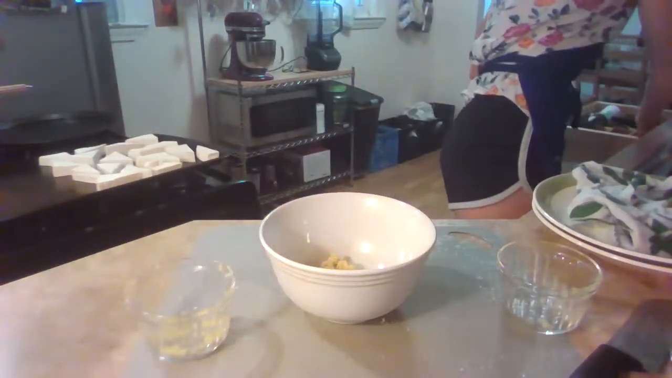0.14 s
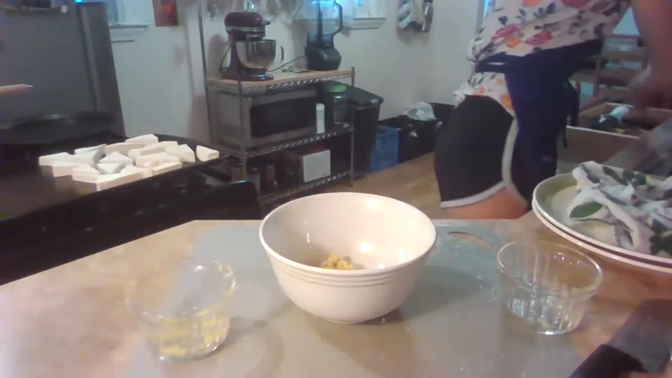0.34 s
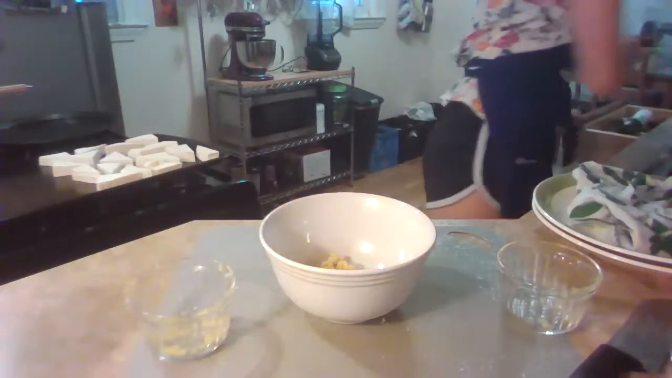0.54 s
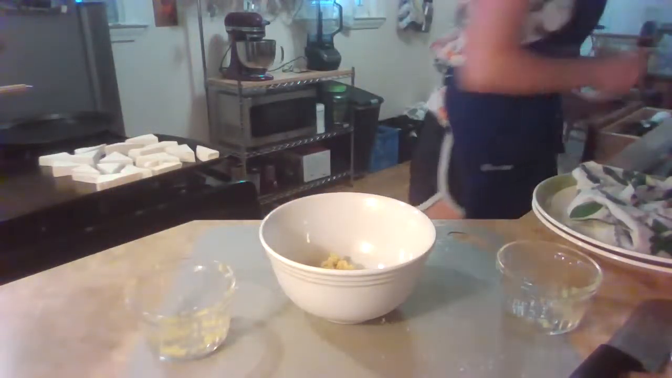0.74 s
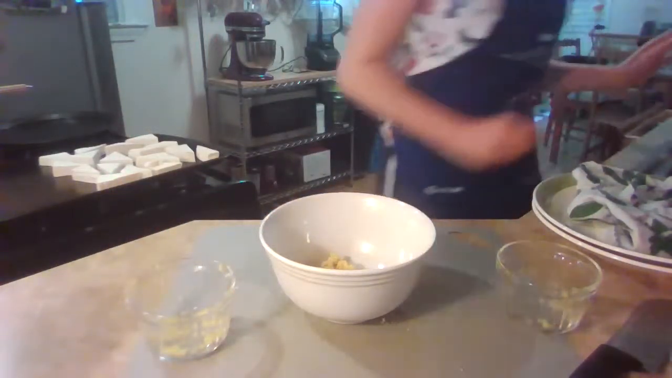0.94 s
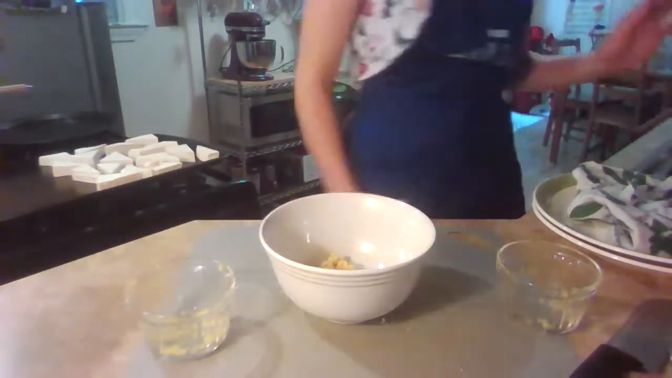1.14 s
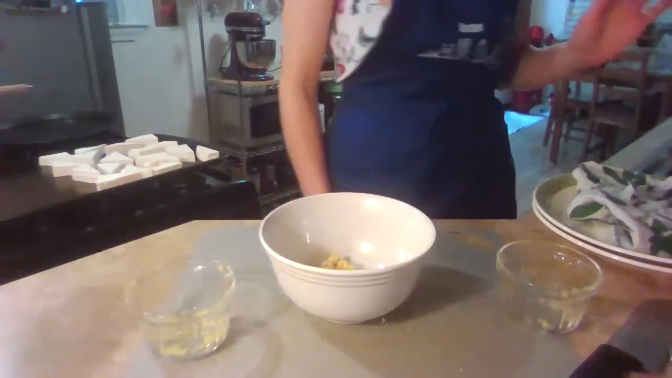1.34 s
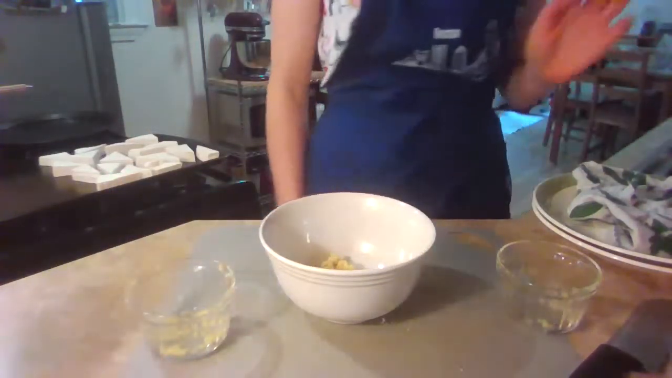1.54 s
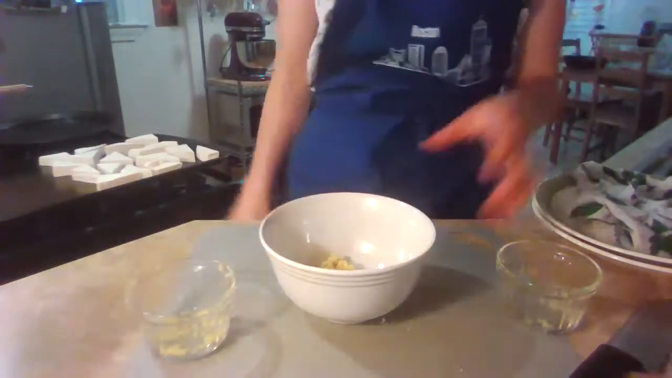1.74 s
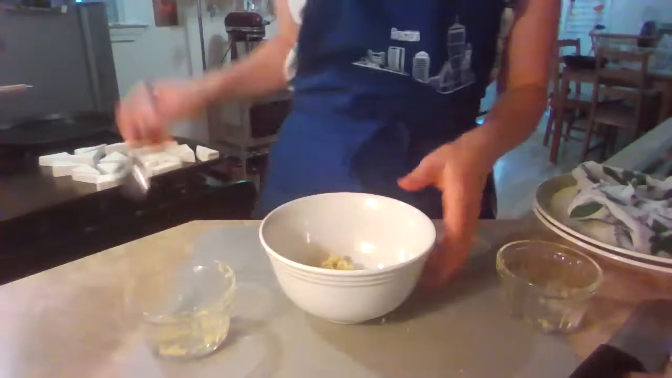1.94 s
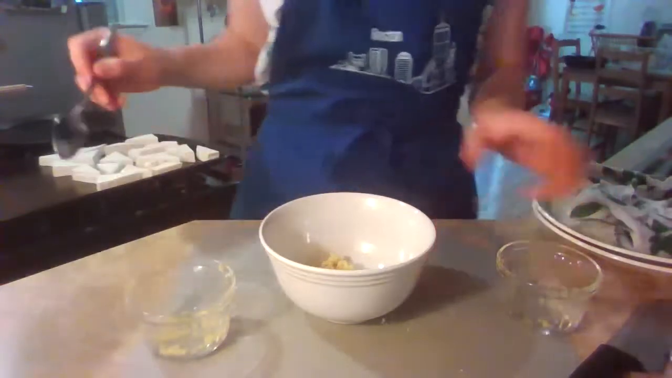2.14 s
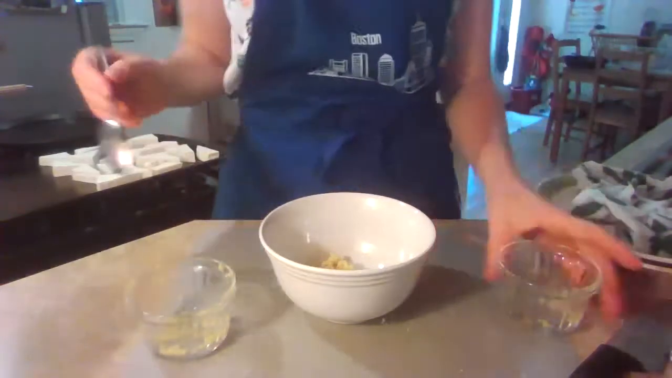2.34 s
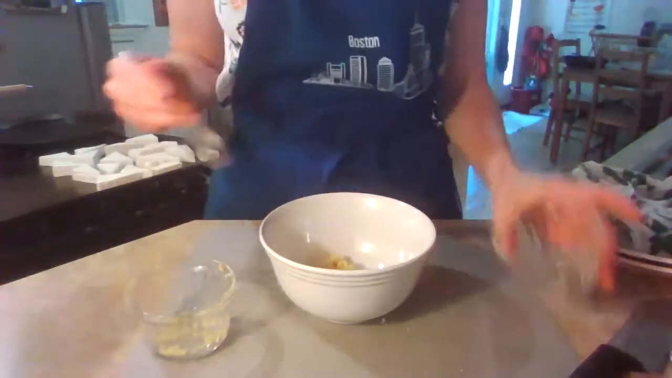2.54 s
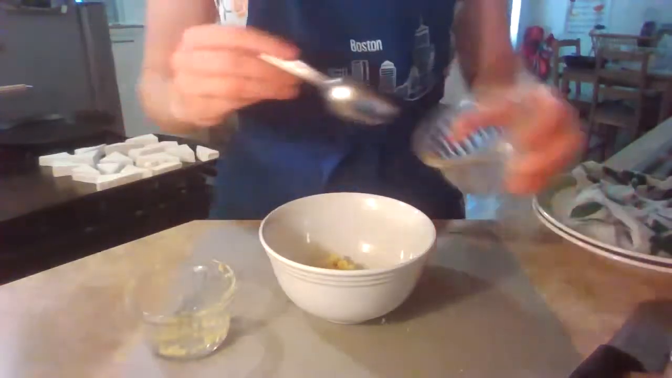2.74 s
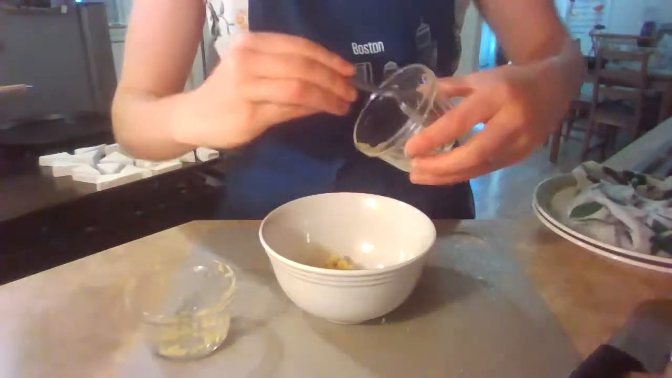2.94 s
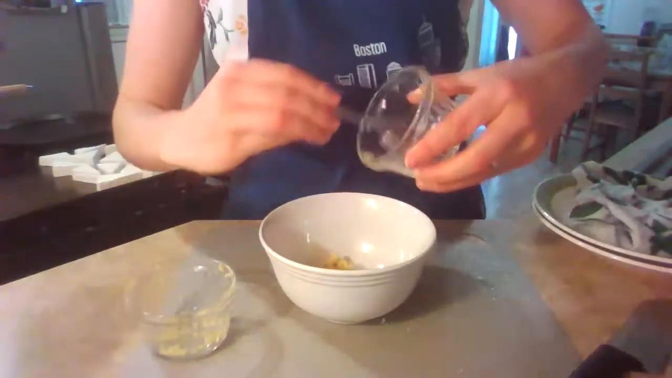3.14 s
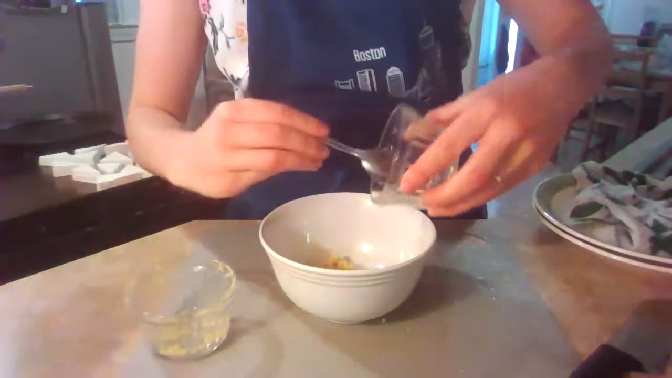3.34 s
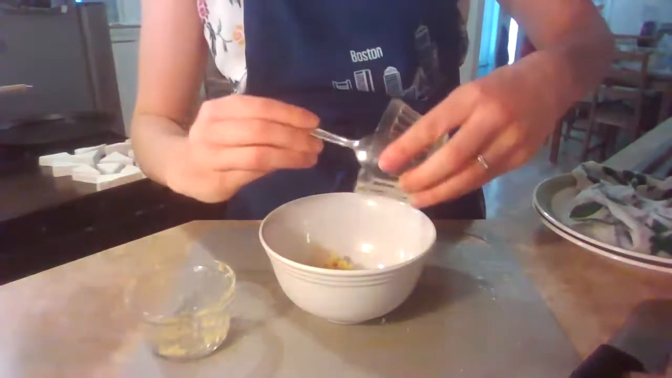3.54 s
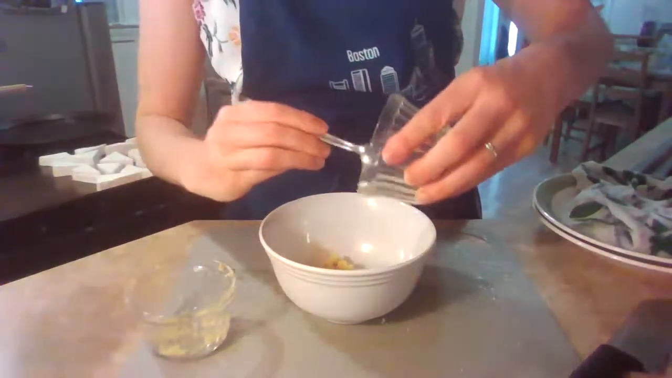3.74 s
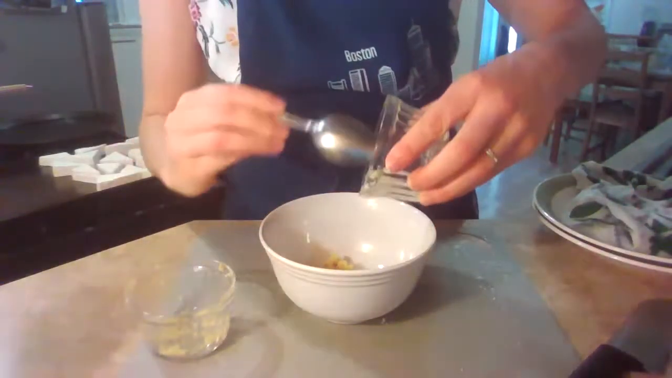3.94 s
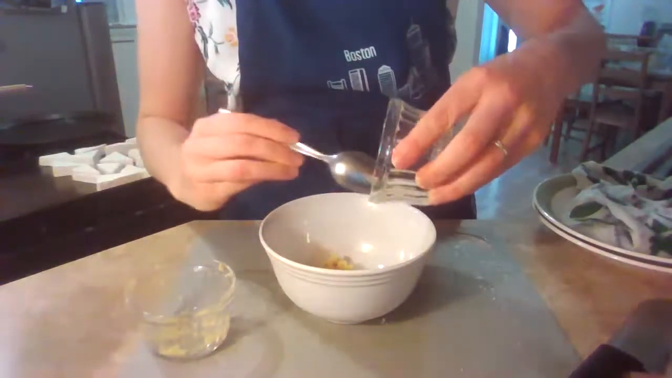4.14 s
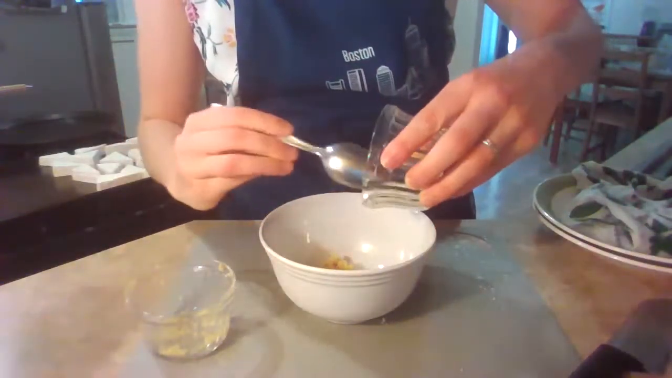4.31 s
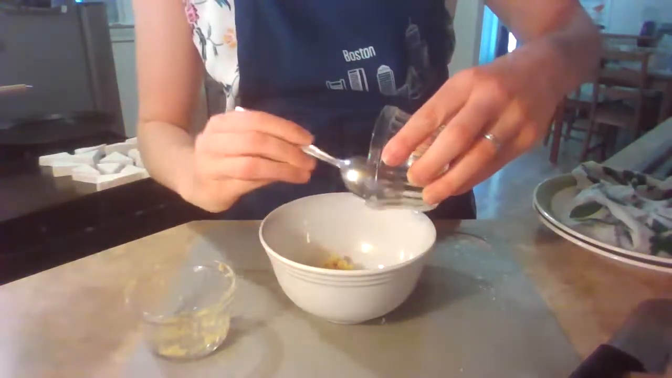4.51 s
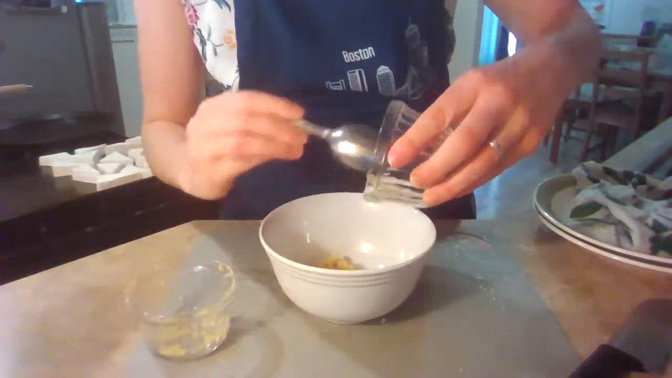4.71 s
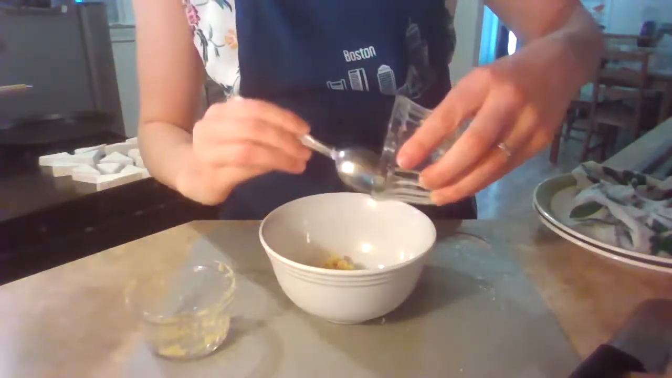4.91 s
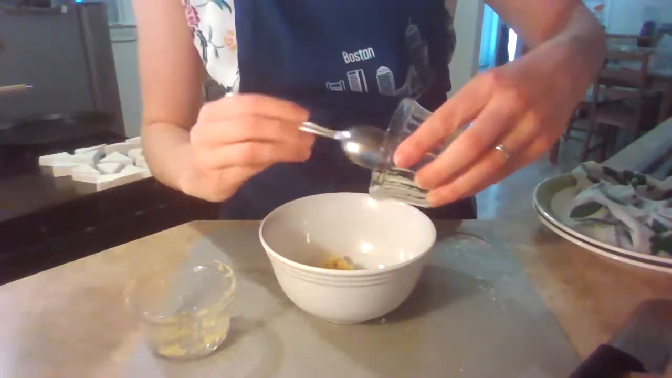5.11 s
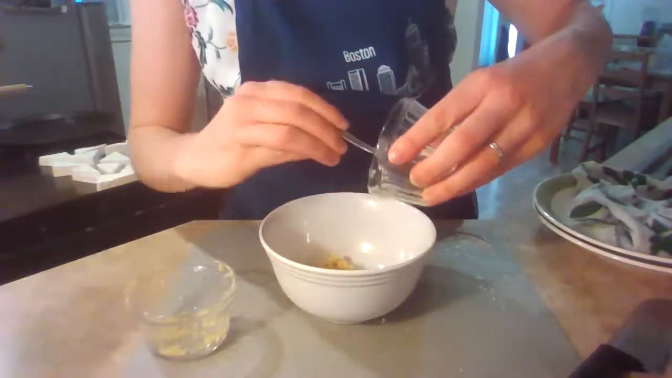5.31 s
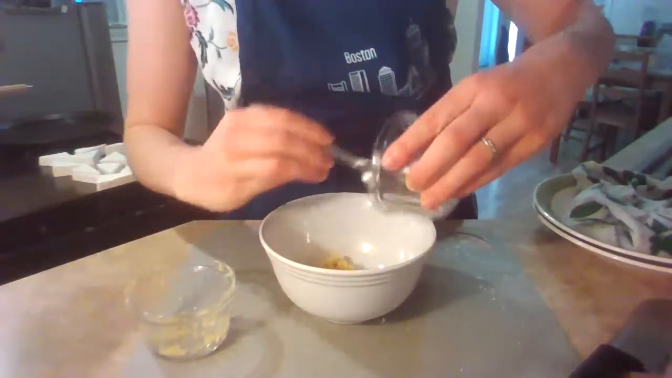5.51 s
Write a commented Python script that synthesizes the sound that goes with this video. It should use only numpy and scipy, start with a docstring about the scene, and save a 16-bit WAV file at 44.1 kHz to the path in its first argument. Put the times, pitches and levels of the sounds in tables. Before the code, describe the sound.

After a short jangle of cutlery and hollow drawer knocks, a steel spoon clinks and scrapes against a little glass dish in a kitchen.

```python
"""A steel spoon taps and scrapes inside a small glass dish. Each impact excites the normal modes of
glass and spoon, which the fingers damp quickly; stick-slip friction drives the scraping. Before this,
cutlery rattles in a drawer, the drawer is pushed shut with hollow knocks, and a hand takes the dish
off the counter. The kitchen adds a short reverberation, over a low appliance hum and microphone hiss."""
import sys
import numpy as np
from scipy import signal
from scipy.fft import rfft, irfft
from scipy.io import wavfile

SR = 44100
rng = np.random.default_rng(int(sys.argv[2]) if len(sys.argv) > 2 else 0)


def wrap_up_sound(samples):
    """Save the sound to the file named by the first command line argument, as 16-bit audio."""
    columns = np.atleast_2d(samples).T
    # keep every value between -1 and 1, then stretch to whole-number steps
    tamed = np.clip(columns, -1, 1)
    steps = np.round(tamed * 32767).astype(np.int16)
    wavfile.write(sys.argv[1], SR, steps)


N = 249821


def from_db(db):
    """Amplitude ratio of a level; the levels in the tables are relative."""
    return 10 ** (np.asarray(db) / 20)


def unit_rms(x):
    """Normalisation to an rms of 1."""
    return x / np.sqrt(np.mean(x ** 2) + 1e-20)


def at_hz(points, hz):
    """Interpolation on a logarithmic frequency axis."""
    frequencies, values = np.transpose(points)
    return np.interp(np.log(hz + 1), np.log(frequencies), values)


def filtered(x, kind, hz, order=4):
    """Maximally flat low-, high- or band-pass filtering."""
    return signal.sosfilt(signal.butter(order, hz, kind, fs=SR, output="sos"), x)


def coloured(x, spectrum):
    """Minimum-phase filtering that preserves the power of white noise."""
    size = 2 ** 13
    log_gain = at_hz(spectrum, np.fft.rfftfreq(size, 1 / SR)) * np.log(10) / 20
    cepstrum = irfft(log_gain)
    cepstrum[1:size // 2] *= 2
    response = irfft(np.exp(rfft(cepstrum[:size // 2], size)))
    return signal.fftconvolve(x, response / np.linalg.norm(response))[:N]


def resonator(force, hz, t60):
    """Damped harmonic oscillator: each impulse starts a decaying sine."""
    r, w = from_db(-60 / (t60 * SR)), 2 * np.pi * hz / SR
    return signal.lfilter([0, np.sin(w)], [1, -2 * r * np.cos(w), r * r], force + 1e-18)


def driven(force, modes):
    """Modal superposition: the summed response to one force, at rms 1."""
    return unit_rms(sum(from_db(db) * resonator(force, hz, t60) for hz, db, t60 in modes))


def impulses(per_s, spread_db):
    """Shot noise: independent clicks of uneven size, at rms 1."""
    sizes = from_db(spread_db * np.minimum(rng.exponential(1, N), 4)) * rng.choice([-1, 1], N)
    return unit_rms(sizes * (rng.random(N) < per_s / SR))


def flicker(corner_hz):
    """Random modulation: low-passed noise at rms 1."""
    r = np.exp(-2 * np.pi * corner_hz / SR)
    return unit_rms(signal.lfilter([1], [1, -2 * r, r * r], rng.standard_normal(N + SR))[SR:])


def bursts(rows):
    """Superposed envelopes with exponential decay, from rows of t/s, level/dB, rise/ms, fall/ms."""
    out, ms = np.zeros(N + SR), np.arange(SR // 3) * 1000 / SR
    for s, db, rise_ms, fall_ms in rows:
        at = round(s * SR)
        out[at:at + len(ms)] += from_db(db) * (1 - np.exp(-ms / rise_ms)) ** 2 * np.exp(-ms / fall_ms)
    return out[:N]


def gain_curves(rows):
    """Gains interpolated in dB from rows of t/s and levels/dB; silent outside their span."""
    times, *levels = np.transpose(rows)
    return from_db([np.interp(np.arange(N) / SR, times, db, -150, -150) for db in levels])


# spectrum of rumble and hiss: f/Hz, spectral level/dB
NOISE_FLOOR = [(13, -62.5), (22, -50.5), (44, -12.5), (88, -23.5), (123, -5), (213, -20), (392, -17),
               (426, -20.5), (762, -28), (829, -33), (1160, -30.5), (5300, -49.5), (9220, -32.5),
               (15200, -36), (16500, -64)]
def background():
    """Broadband noise, and an appliance hum that wavers as narrow-band noise does."""
    hum = unit_rms(resonator(rng.standard_normal(N), hz=121.8, t60=0.126))
    floor = coloured(rng.standard_normal(N), NOISE_FLOOR) * from_db(flicker(3.5))
    return from_db(-53) * floor + from_db(-53.5) * hum


# reverberation time of the kitchen: f/Hz, T60/s
REVERB_TIMES = [(250, 0.17), (1500, 0.37), (5000, 0.43), (14000, 0.41)]
def reverberation(x):
    """Diffuse field: convolution with octave bands of noise, each decaying at its own rate."""
    t, tail = np.arange(SR // 2) / SR, 0
    for low_hz in 150 * 2. ** np.arange(7):
        band = filtered(rng.standard_normal(len(t)), "band", [low_hz, 2 * low_hz], order=2)
        tail += band * from_db(-60 * t / at_hz(REVERB_TIMES, 0.88 * low_hz))
    tail *= 1 - np.exp(-(t / 0.0009) ** 2)
    return signal.fftconvolve(x, tail / np.linalg.norm(tail))[:N]


# dull bumps through the counter: t/s, level/dB, f/Hz, T60/s
COUNTER_BUMPS = [(0.712, -43, 163, 0.27), (1.031, -48, 74.5, 0.13), (2.368, -28.5, 143.3, .14),
                 (2.376, -32.5, 85.5, 0.15), (2.421, -39, 199, 0.21), (3.49, -24, 84.2, 0.044)]
def counter():
    """Structure-borne sound: each bump is one low damped mode with a soft onset."""
    out, t = np.zeros(N), np.arange(SR // 3) / SR
    onset = 1 - np.exp(-t / 0.0085)
    for s, db, hz, t60 in COUNTER_BUMPS:
        at = round(s * SR)
        out[at:at + len(t)] += from_db(db + 7.5 - 60 * t / t60) * onset * np.sin(2 * np.pi * hz * t)
    return out


# knocks of the drawer: t/s, level/dB, rasp re knock/dB, fall/ms
DRAWER_KNOCKS = [(0.851, -44, -6.5, 135), (.92, -46.5, -18, 38), (0.991, -60.5, 17.5, 57),
                 (1.05, -61, -5, 36), (1.499, -57.5, -0.5, 120), (1.588, -52.5, -1.5, 71),
                 (1.658, -57, 5, 25)]
# modes of the drawer: f/Hz, level/dB, T60/s
DRAWER_MODES = [(298, -1, 0.079), (448, 2, 0.06), (645, 5, 0.027), (1205, -2.5, 0.062)]
# rasp of sliding wood: f/Hz, spectral level/dB
WOOD_SPECTRUM = [(300, -10), (650, 1), (1200, -7.5), (2050, -11), (2350, -9), (2750, -15.5), (7000, -24.5)]
def drawer():
    """Forced vibration of a wooden box: contact noise gives hollow knocks and a rasp."""
    force = impulses(per_s=3000, spread_db=0.53)
    knocks = bursts([(s, db, 8, fall_ms) for s, db, _, fall_ms in DRAWER_KNOCKS])
    slides = bursts([(s, db + rasp_db, 6, fall_ms) for s, db, rasp_db, fall_ms in DRAWER_KNOCKS])
    return knocks * driven(force, DRAWER_MODES) + slides * coloured(force, WOOD_SPECTRUM)


# shifts of the cutlery heap: t/s, level/dB, treble re lower band/dB
HEAP_SHIFTS = [(.0, -18, 5.5), (0.02, -23, 3.5), (.06, -23.5, -17), (0.12, -20, -5), (0.141, -11.5, 7),
               (.19, -17.5, 4), (0.272, -19.5, -0.5), (.315, -31, -19)]
# clatter of the heap: f/Hz, spectral level/dB
HEAP_SPECTRUM = [(130, -57), (250, -14), (500, -3), (900, -10), (1250, -2.5), (3100, -3.5), (7400, -12.5),
                 (10000, -3), (11100, -7.5), (12300, 0.5), (15600, -1)]
# single pieces ringing out: t/s, f/Hz, level/dB, T60/s
STEEL_RINGS = [(.012, 2240, -24, .08), (.015, 1195, -22, .3), (.022, 10370, -23, .4), (.12, 11765, -18, .3),
               (.125, 3903, -24, .4), (.135, 7410, -28, .45), (.14, 10400, -19, .45), (.145, 2990, -14, .2),
               (.15, 500, -25, .25), (.16, 9573, -22, .4), (.165, 9078, -26, .4), (.275, 2560, -24, .22),
               (.28, 2690, -23, .25), (.275, 1320, -23, .2), (.28, 3430, -26, .22), (.275, 5385, -26, .25),
               (.285, 11300, -28, .12)]
def cutlery():
    """Random collisions merge into noise as the heap shifts, and excite a few clear steel modes."""
    hail = coloured(impulses(per_s=5000, spread_db=3.3), HEAP_SPECTRUM)
    split_hz, rise_ms, fall_ms = 7000, 6.3, 38.3
    lower = bursts([(s, db, rise_ms, fall_ms) for s, db, _ in HEAP_SHIFTS])
    treble = bursts([(s, db + treble_db, rise_ms, fall_ms) for s, db, treble_db in HEAP_SHIFTS])
    out = lower * unit_rms(filtered(hail, "low", split_hz))
    out += treble * unit_rms(filtered(hail, "high", split_hz))
    t = np.arange(SR // 2) / SR
    for s, hz, db, t60 in STEEL_RINGS:
        at = round(s * SR)
        jostled = unit_rms(resonator(hail[:SR], hz, t60=.045)[-len(t):])   # neighbours keep knocking it
        out[at:at + len(t)] += from_db(db - 60 * t / t60) * (1 - np.exp(-t / 0.0025)) * jostled
    return out


# impacts on the glass, first as the dish is taken up, then by the spoon:
# t/s, crack level/dB, ring level/dB, brightness/dB, spoon bowl f/Hz, contact time/ms
IMPACTS = [(2.3415, -22.5, -58, 26, 5520, 5.3), (2.9273, 1, -12, -1.5, 4100, 5.9),
           (2.9417, -16.5, -12, -4, 5500, 20), (2.9843, 1, -8.5, -34, 4630, 3.4),
           (3.0745, -16, -26, -25, 4600, 3.2), (3.0868, -4, -15, -33, 4790, 3.6),
           (3.128, -14.5, -29, -1, 3100, 2.1), (3.1516, -12.5, -35, -15, 3040, 3.3),
           (3.1841, -10.5, -22, -10, 4805, 8.9), (3.241, -9, -21, 2.5, 3370, 3.4),
           (3.2597, -9.5, -16.5, 4, 3075, 8.7), (3.2949, -4, -18, -10, 3428, 7.6),
           (3.3457, -8.5, -17.5, -22, 3640, 5.8), (3.5767, 1, -8.5, 0, 4830, 7.1),
           (3.6664, -9.5, -13, 0.5, 4870, 4.5), (3.686, -2.5, -12, -17, 5320, 8.6),
           (3.7087, -23, -5.5, -12, 3020, 10.4), (3.7336, 3.5, -3.5, 4, 3370, 2.9),
           (3.7529, 6.5, -6.5, 4, 3650, 5.2), (4.0321, -14, -21.5, -8, 3780, 7.5),
           (4.0832, -9, -4, -11, 3000, 5.9), (4.1044, -9, -6.5, -11, 3170, 10.7),
           (4.1169, -15, -1.5, -17, 3230, 2.5), (4.1378, -23, -9.5, -35, 4580, 3.8),
           (4.155, -33, -3.5, -13, 3220, 3.8), (4.167, -10.5, -16.5, 10, 3320, 6.5),
           (4.1928, -18, -7.5, -6, 3190, 2.6), (4.415, -26.5, -30.5, -4, 3960, 3.4),
           (4.4904, -20.5, -26, 2.5, 4810, 7), (4.518, -20, -20.5, -14, 3600, 3.7),
           (4.545, -20, -25, -12, 3330, 3.6), (4.571, -15, -17, -1, 3460, 2.9),
           (4.6152, -41, -22, -7, 3190, 6.7), (4.8281, -27, -20.5, -39, 2890, 4.3),
           (4.911, -20.5, -18.5, -2.5, 3800, 6.9), (4.966, -22, -26, -9, 3480, 4.1),
           (4.9926, -1, -2, -0.5, 3270, 2.9), (5.0137, -10.5, -27, 7.5, 4440, 4.4),
           (5.231, -6, -21, 16.5, 4700, 7), (5.2578, -1.5, -12, 3, 4845, 10.2),
           (5.3508, -2.5, -10, 3.5, 3220, 4), (5.3708, -11, -8, 3, 2900, 16.8),
           (5.3813, -12.5, -7, -12, 3400, 2.4), (5.422, -13.5, -1.5, -16, 3480, 9.3),
           (5.465, -6, -11.5, -21, 3610, 1.9), (5.4842, -11, -14.5, 4.5, 3440, 5.1),
           (5.5822, -3, -21.5, 26.5, 3380, 7.5), (5.6061, 2, -16, 28.5, 3380, 6.8),
           (5.6163, -20, -16, 26, 3180, 3)]
# freedom of the spoon to ring; pressing chokes the handle and frees the bowl:
# t/s, handle re impact/dB, bowl re impact/dB
SPOON_GRIP = [(2.34, -50, -12), (2.93, -20.5, -48), (3.08, -2.5, -17), (3.26, -7, 5.5), (3.35, -10, -6.5),
              (3.58, -24, -39), (3.7, -12, -4), (3.75, -26, -11), (4.03, -24.5, -13), (4.109, -13, -23),
              (4.16, -40, -8.5), (4.49, -14, -12.5), (4.6, -46, -2.5), (4.829, -23.5, -29.5),
              (5.0, -32.5, -5.5), (5.26, -11, -2.5), (5.422, -16.5, -10), (5.475, -40, -3),
              (5.6, -18.5, -8.5)]
def excitations():
    """Modal excitation: strength, brightness and grip set the level of each mode group per impact."""
    s, crack_db, rim_db, bright_db, bowl_hz, contact_ms = np.transpose(IMPACTS)
    times, *freedom = np.transpose(SPOON_GRIP)
    handle_db, bowl_db = (np.maximum(crack_db, rim_db) + np.interp(s, times, db) for db in freedom)
    wall_db, top_db = rim_db - 2 + 0.75 * bright_db, rim_db + bright_db
    return np.transpose([s, contact_ms, bowl_hz, handle_db, rim_db, bowl_db, wall_db, top_db])


# contact noise of steel on glass: f/Hz, spectral level/dB
CONTACT_SPECTRUM = [(150, -56.5), (300, -27.5), (1000, -24), (1340, -22), (2130, -12), (2700, -9),
                    (3500, -11), (5000, -7), (6600, -6), (7800, -12), (9000, -5.5), (14000, -10),
                    (16500, -22)]
def cracks():
    """A brief contact has a broad spectrum: each skid gives a burst of noise, unevenly coloured."""
    grit = impulses(per_s=9000, spread_db=2)
    edges_hz = [250, *np.geomspace(1340, 18000, 9)[1:]]
    colours_db = 4 * rng.standard_normal((len(IMPACTS), 8))
    out = np.zeros(N)
    for band, offsets_db in zip(zip(edges_hz, edges_hz[1:]), colours_db.T):
        envelope = bursts([(s, db - 2 + offset, 0.33 * contact_ms, 1.5 * contact_ms)
                           for (s, db, *_, contact_ms), offset in zip(IMPACTS, offsets_db)])
        out += filtered(grit * envelope, "band", band, order=2)
    return coloured(out, CONTACT_SPECTRUM)


# modes of the spoon handle and of the glass (rim, wall, highest group): f/Hz, level/dB, T60/s
HANDLE_MODES = [(1231, -12, 0.3), (1336, -4.5, 0.15), (1452, 3.5, 0.032)]
RIM_MODES = [(2742, 0, .15), (2815, -3, .08), (2890, -6, .05)]
WALL_MODES = [(6300, -3, .05), (6405, -1, .07), (6530, -5, .05), (7170, -18, .05)]
TOP_MODES = [(10370, -12, .04), (10640, -6, .07), (10720, -8, .05), (12350, -16, .03), (14300, -11, .035)]
def taps():
    """Damped free vibration: the modes swell during contact, which then chokes most of the ring."""
    out, t = np.zeros(N + SR), np.arange(SR // 4) / SR
    chances = rng.random((len(IMPACTS), 3, 32))
    wavers = [np.pad(from_db(2 * flicker(70)), (0, SR)) for _ in range(5)]   # from the rubbing contact
    for impact, draws in zip(excitations(), chances):
        s, contact_ms, bowl_hz, handle_db, rim_db, bowl_db, wall_db, top_db = impact
        at, contact_s = round(s * SR), contact_ms / 1000
        span = slice(at, at + len(t))
        swell = (1 - np.exp(-t / (0.37 * contact_s))) ** 2
        choke = 0.19 + np.exp(-(t / (2.37 * contact_s)) ** 2)
        groups = ((HANDLE_MODES, handle_db), (RIM_MODES, rim_db),
                  (WALL_MODES, wall_db), (TOP_MODES, top_db))
        modes = [(hz, db + group_db, t60) for group, group_db in groups for hz, db, t60 in group]
        # the grip sets the pitch of the spoon bowl's rough cluster anew at each touch
        modes += [(bowl_hz * ratio, bowl_db + db, .03)
                  for ratio, db in ((.94, 2), (1, 4.5), (1.05, 1), (1.36, -5.5))]
        for k, ((hz, db, t60), phase, spot, grip) in enumerate(zip(modes, *draws)):
            hz *= 1 + .011 * (grip - .5)   # fingers shift the modes a little
            spot_db = 5 + 11.8 * (spot - 1)   # the place struck favours some modes
            envelope = from_db(db + spot_db - 60 * t / t60) * swell * choke * wavers[k % 5][span]
            out[span] += envelope * np.sin(2 * np.pi * (hz * t + phase))
    return out[:N]


# spoon dragged along the glass: t/s, duration/s, level/dB, cavity re glass/dB, bowl re glass/dB
SPOON_STROKES = [(2.76, 0.27, -47.5, 12.5, 4.5), (3.152, 0.091, -25.5, 0, -3.5),
                 (3.283, .11, -26, -10.5, 1), (3.688, 0.078, -17.5, -16, -4), (4.067, 0.15, -25, -18, -4),
                 (4.476, 0.1, -26.5, -14, -9), (4.828, 0.029, -39.5, 3, -7), (4.904, 0.13, -24, -2.5, -4),
                 (5.268, .12, -29.5, -22, 6), (5.405, 0.09, -24, -12, 3.5), (5.503, 0.15, -17, -35, -14)]
# resonances of the rim damped by the spoon, the dish's hollow and the spoon bowl: f/Hz, level/dB, T60/s
PRESSED_RIM_MODES = [(2560, -6, .012), (2760, 0, .015), (2960, -3, .012)]
CAVITY_MODES = [(2170, 1.5, 0.071), (2090, -9, 0.12)]
BOWL_MODES = [(3180, -4, 0.03), (3703, 0, 0.013), (3980, -6.5, 0.0096), (4600, -7.5, 0.021),
              (5100, -10, 0.03)]
def scrapes():
    """Stick-slip friction drives glass, cavity and spoon; the handle buzzes on after each impact."""
    contour = (0, -18), (0.81, 0), (1, -9.5)   # swell, then lift-off: share of the stroke, level/dB
    gains = np.zeros((3, N))
    for s, duration, db, cavity_db, bowl_db in SPOON_STROKES:
        peaks_db = db + np.array([0, cavity_db, bowl_db])
        gains += gain_curves([(s + share * duration, *(peaks_db + dip)) for share, dip in contour])
    glass_gain, cavity_gain, steel_gain = gains
    slips = impulses(per_s=3000, spread_db=3.7) * from_db(3.1 * flicker(60))
    glass = driven(slips, PRESSED_RIM_MODES)
    glass += from_db(-7.5) * driven(slips, WALL_MODES) + from_db(-18) * driven(slips, TOP_MODES)
    steel = driven(slips, BOWL_MODES) + from_db(-9) * unit_rms(coloured(slips, CONTACT_SPECTRUM))
    rubbed = glass_gain * glass + cavity_gain * driven(slips, CAVITY_MODES) + steel_gain * steel
    buzz_gain = bursts([(s, handle_db - 19.5, 5, 40) for s, _, _, handle_db, *_ in excitations()])
    buzz = buzz_gain * driven(slips, HANDLE_MODES)
    return filtered(rubbed, "high", 1700) + filtered(buzz, "high", 1000)   # small bodies radiate no bass


def scene():
    """Direct and reverberant sound add: the farther cutlery has more echo than the near dish."""
    near = taps() + cracks() + scrapes()
    far = cutlery()
    echo = reverberation(from_db(-12.5) * near + from_db(-8) * far)
    return (near + from_db(-1) * far + echo + drawer() + counter() + background())[None]


def record(dry):
    """Soft saturation rounds the highest peaks; band limiting cuts the deep bass and the top."""
    rounded = .72 * np.tanh(dry / .72)
    steep_lowpass = signal.ellip(12, .5, 90, 15750, fs=SR, output="sos")
    return signal.sosfilt(steep_lowpass, filtered(rounded, "high", 48))


dry = scene()
out = record(dry)
wrap_up_sound(out)
```